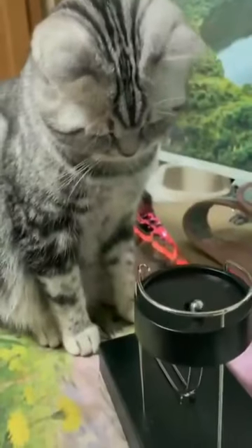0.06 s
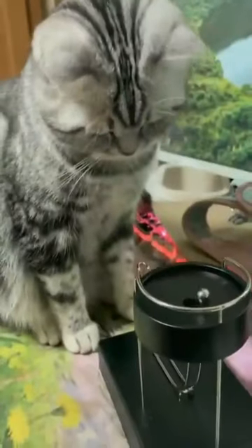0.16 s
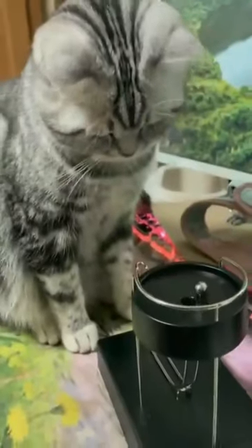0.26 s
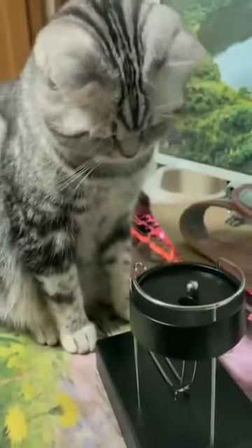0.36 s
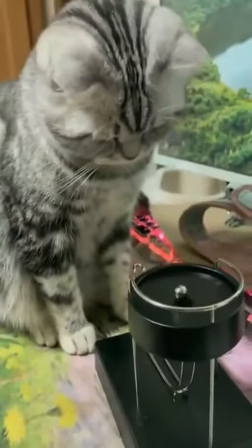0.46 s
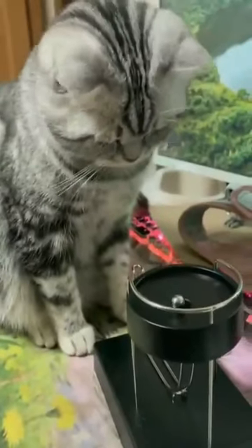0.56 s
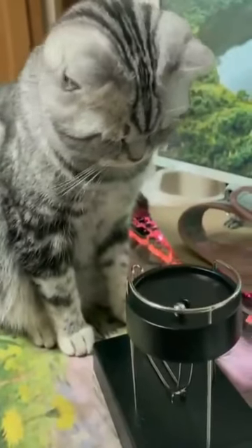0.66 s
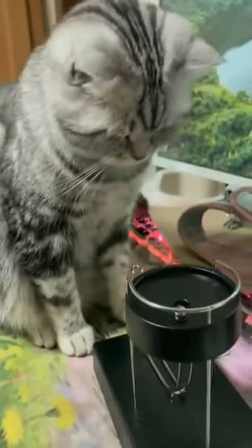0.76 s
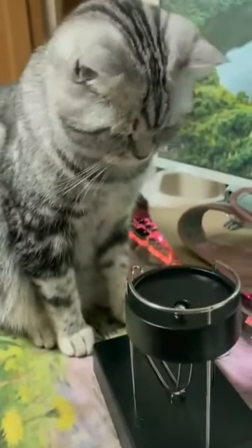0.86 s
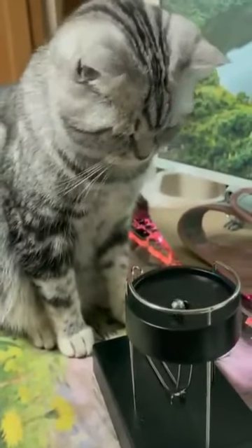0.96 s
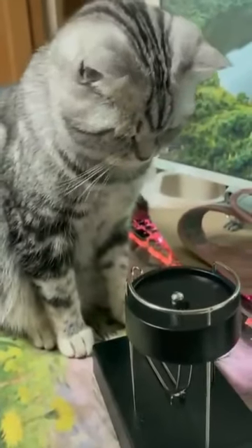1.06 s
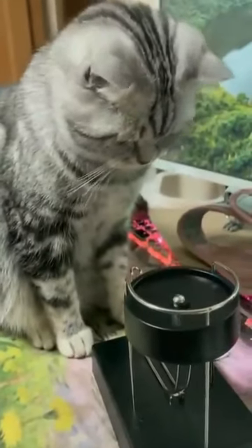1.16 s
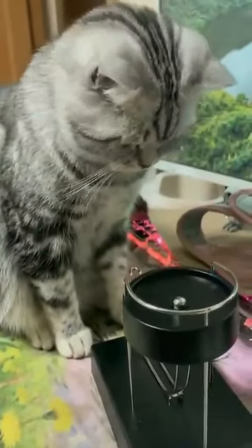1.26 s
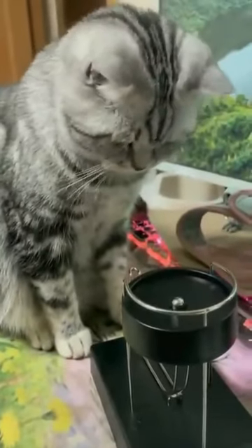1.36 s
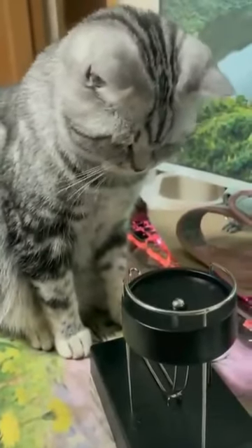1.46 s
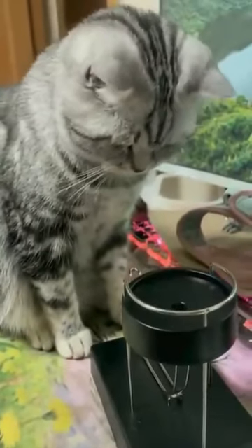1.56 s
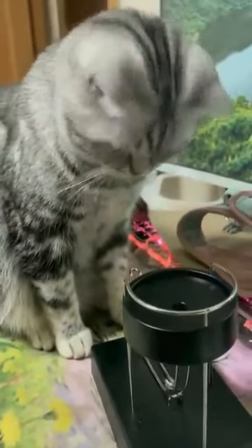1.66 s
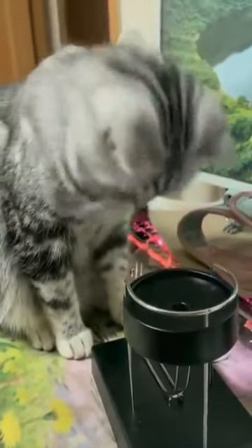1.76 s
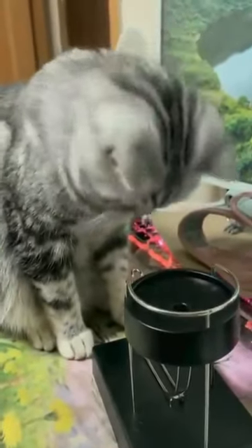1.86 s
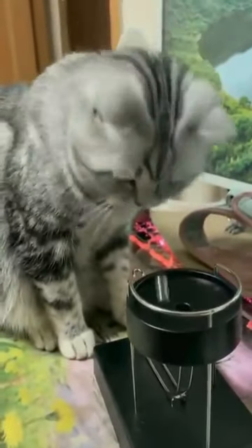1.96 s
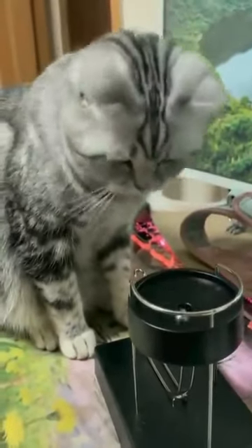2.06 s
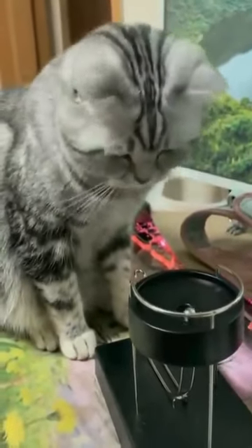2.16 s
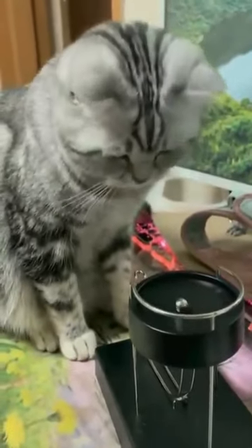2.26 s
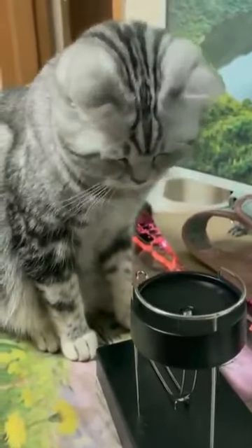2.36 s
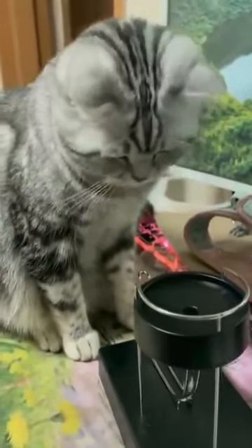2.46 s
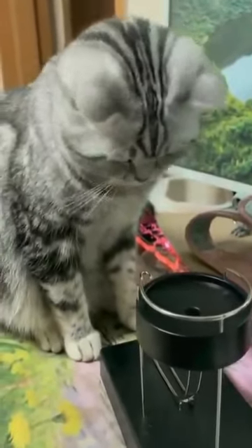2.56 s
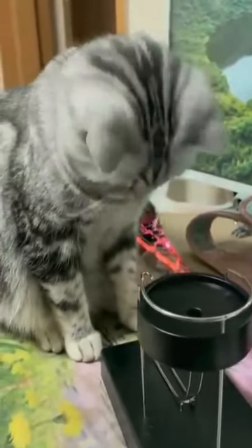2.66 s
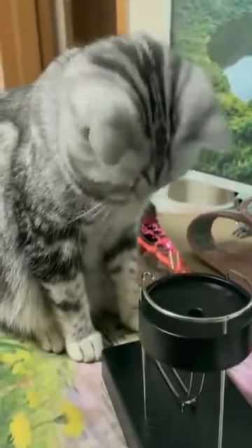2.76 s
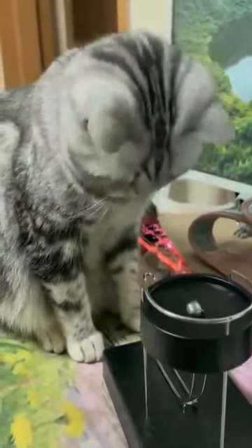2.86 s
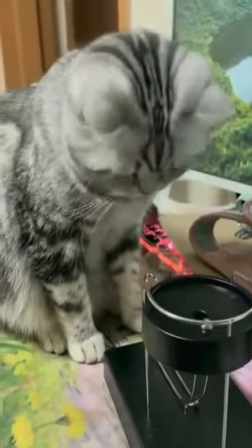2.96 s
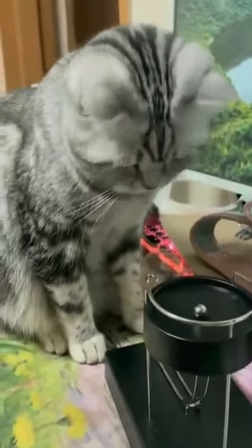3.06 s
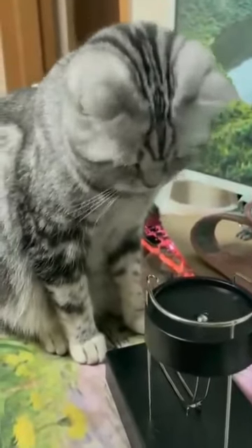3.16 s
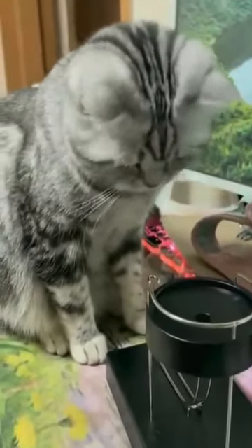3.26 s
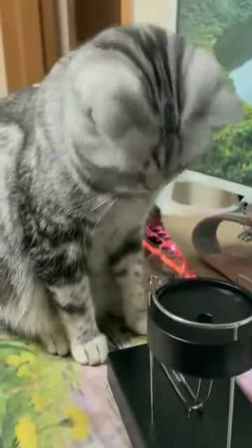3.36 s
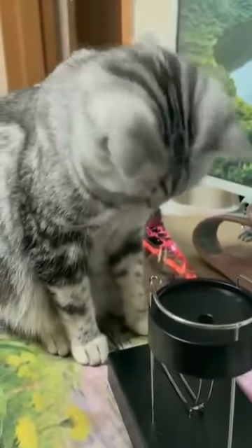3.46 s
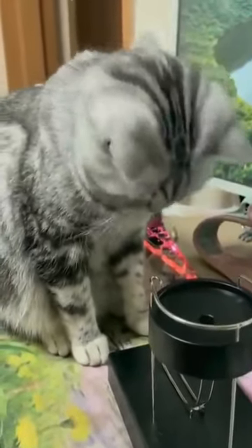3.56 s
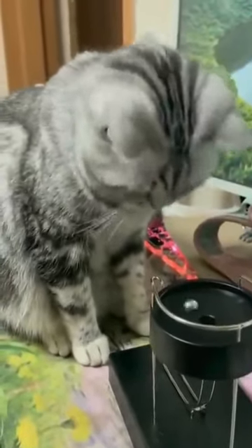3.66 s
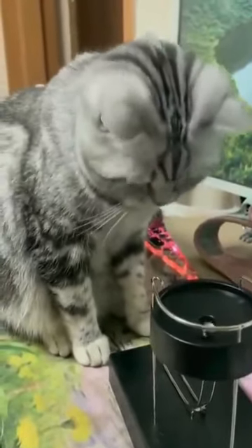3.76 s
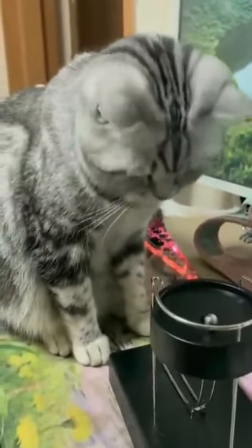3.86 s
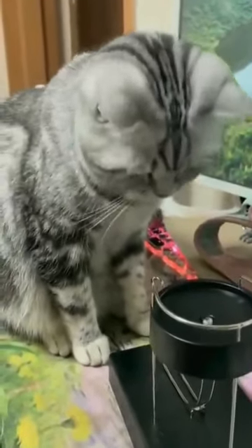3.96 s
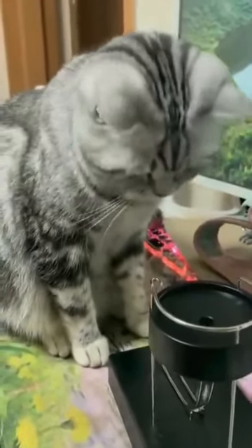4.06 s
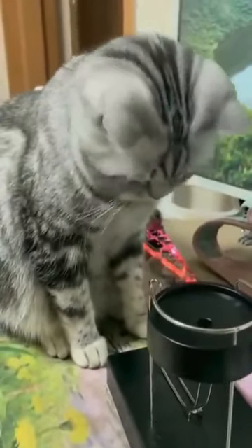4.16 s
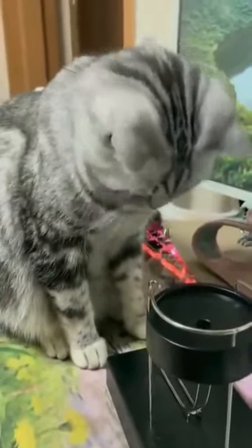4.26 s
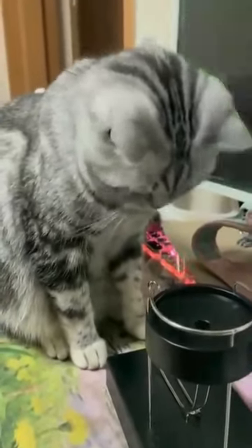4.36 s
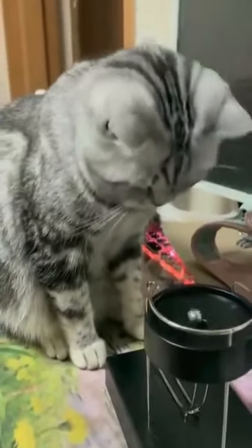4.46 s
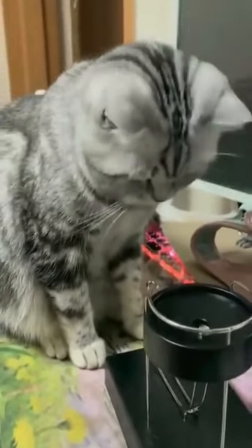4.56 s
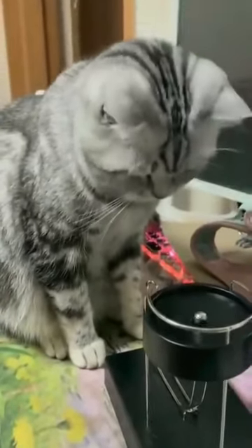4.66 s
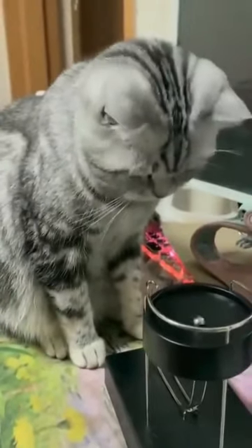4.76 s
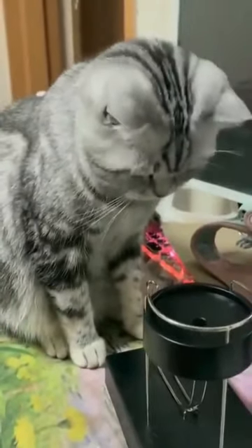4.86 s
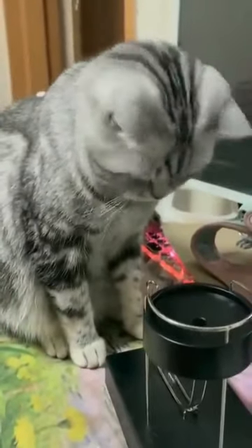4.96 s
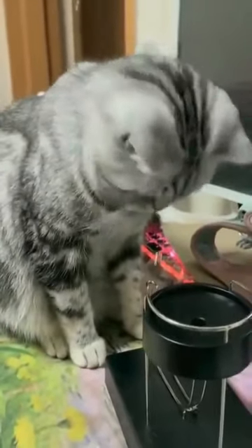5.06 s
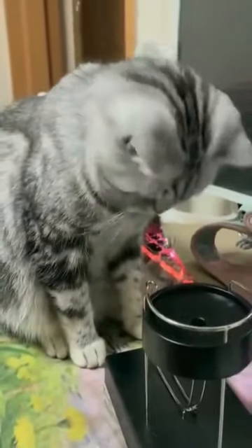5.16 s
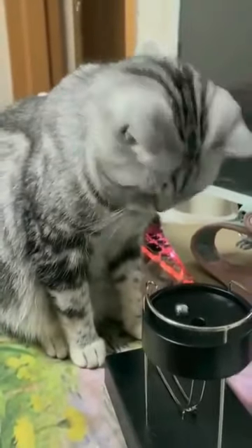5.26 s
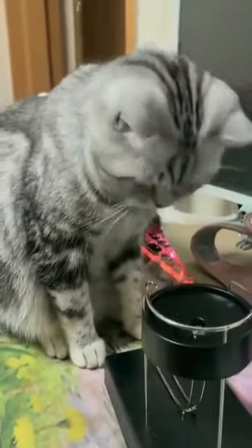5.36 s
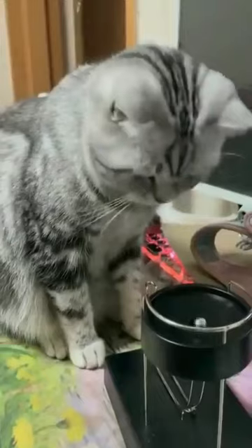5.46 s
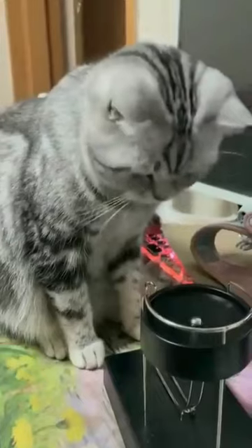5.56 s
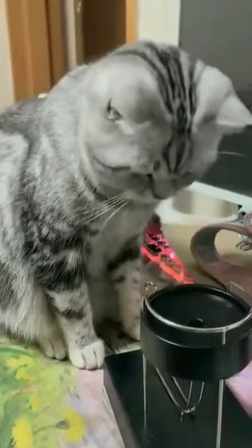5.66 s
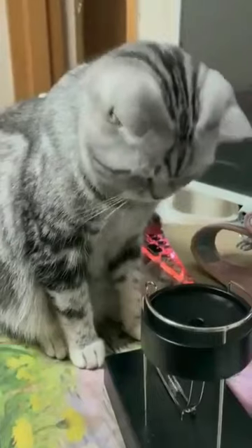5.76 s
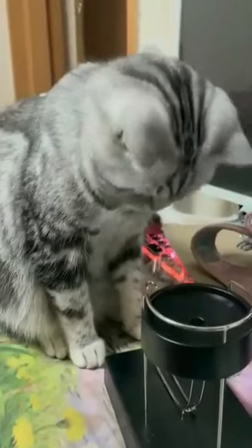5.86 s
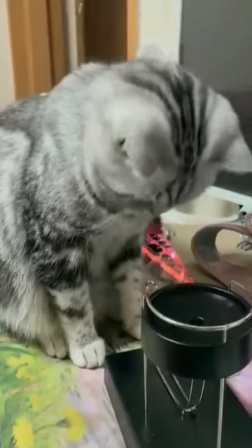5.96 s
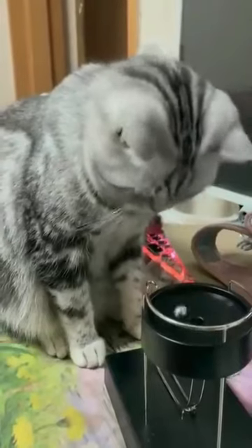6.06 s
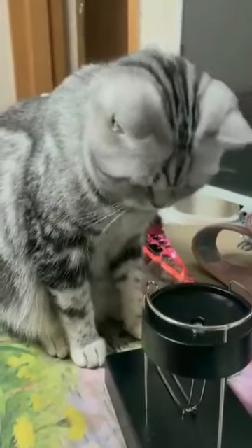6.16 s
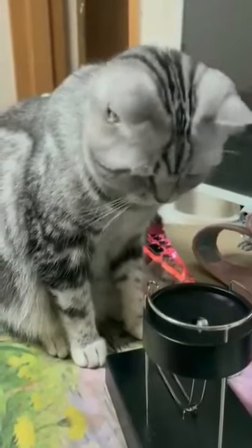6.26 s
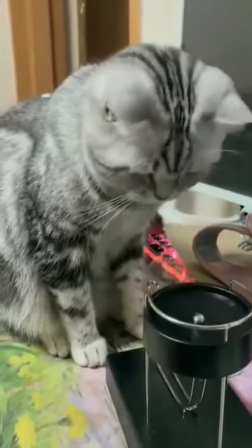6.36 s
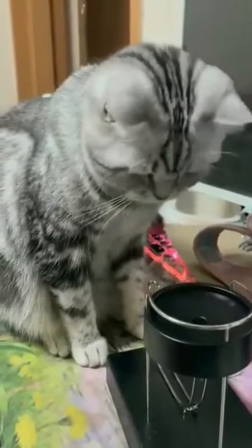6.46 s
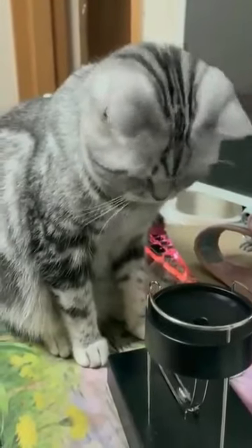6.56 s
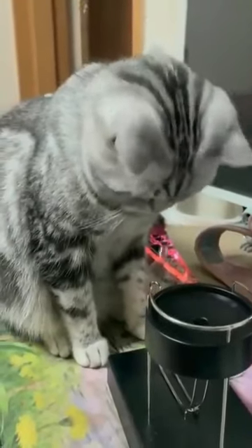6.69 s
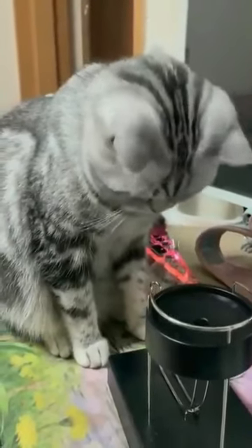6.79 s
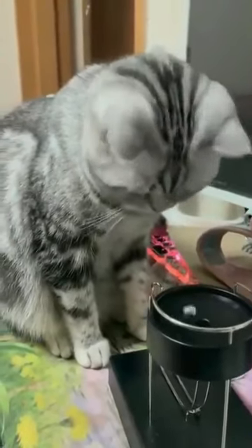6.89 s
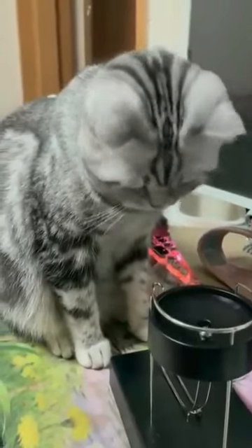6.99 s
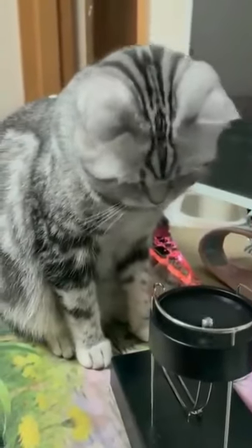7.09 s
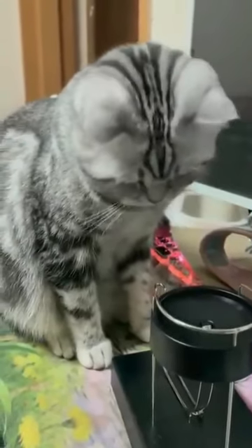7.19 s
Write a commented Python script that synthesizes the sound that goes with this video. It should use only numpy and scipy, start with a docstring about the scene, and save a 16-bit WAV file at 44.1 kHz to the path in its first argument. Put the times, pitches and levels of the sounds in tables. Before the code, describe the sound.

Close by in a quiet room, a metal desk toy sends a steel ball round and round. After some soft circling in the bowl, the ball drops and slides along thin rails with a light, singing hiss. Seven landings follow, a little under a second apart, each a bright crack with quick shrinking bounces, a rim knock and a short roll before the next drop. The base rumbles faintly against the desk.

```python
"""Steel ball looping through a desk toy

A steel ball circles a small bowl, drops through its hole, hisses down wire rails and is flung back up.
On each of seven landings it cracks against the bowl and sets it ringing, hops, knocks the rim and rolls
round to the hole. Rolling bumps make the bowl hum, grit makes the rails sing, and the base thuds on
the desk, all over faint room tone with a short echo."""
import sys
import numpy as np
from scipy import signal
from scipy.fft import rfft, irfft, next_fast_len
from scipy.io import wavfile
from scipy.ndimage import uniform_filter1d

SR = 44100
rng = np.random.default_rng(int(sys.argv[2]) if len(sys.argv) > 2 else 0)


def master_out(mix):
    """Clip the mix to full scale and print it as 16-bit PCM to the path in sys.argv[1]."""
    frames = np.transpose(np.atleast_2d(mix))
    ceiling = np.clip(frames, -1, 1)
    pcm = np.round(ceiling * 32767).astype(np.int16)
    wavfile.write(sys.argv[1], SR, pcm)


N = 318843

# room tone: (frequency [Hz], level [dB])
AIR_SPECTRUM = [(18, -41.5), (30, -1), (64, -11.5), (98, -14), (194, -8.5), (394, -0.5), (937, -7),
                (1010, -12.5), (16000, -38)]
# room echo: (frequency [Hz], t60 [s])
ROOM_DECAY = [(150, 0.51), (500, 0.59), (1500, 0.19), (4000, 0.42), (9000, 0.056), (14000, 0.2)]
# microphone colour: (frequency [Hz], gain [dB])
MIC_EQ = [(25, -2), (70, -4.5), (4500, 1), (4950, -4), (5400, 0.5), (8500, 1), (9000, -5), (9600, 3.5),
          (12000, 10.5), (12500, 6), (14500, 3), (15000, -2.5)]
# base shaking the desk: (frequency [Hz], level [dB])
SHAKE_SPECTRUM = [(30, -27), (60, -15), (85, -6), (145, -8.5), (200, -13), (280, -13.5), (360, -24.5),
                  (500, -70.5)]
# steel on wire: (frequency [Hz], level [dB])
HISS_SPECTRUM = [(240, -47), (400, -24), (581, -1.5), (723, -25.5), (1290, 2), (1480, -4.5), (1650, -9),
                 (2250, -3), (3320, -3.5), (4260, -7), (7010, -1), (8720, -8.5), (11000, -9.5),
                 (15700, -38.5), (16500, -41.5)]
# chatter of a knock: (frequency [Hz], level [dB])
SCUFF_SPECTRUM = [(180, -49), (300, -11), (617, -27), (1000, -5.5), (2400, -8.5), (2790, -3.5),
                  (4690, -10.5), (5020, -11.5), (5930, -5.5), (9020, -13), (11000, -17.5), (15400, -35.5),
                  (16500, -49)]
# first contact of a bounce: (frequency [Hz], level [dB])
CRACK_SPECTRUM = [(290, -55), (500, -6.5), (1310, -9.5), (3210, -6.5), (3770, -12.5), (4420, -12),
                  (4970, -12.5), (6190, -10), (9190, -25.5), (11300, -29.5), (16500, -57)]
# wire rails: (frequency [Hz], level [dB], t60 [s])
RAIL_MODES = [(265, -4, .4), (807, -7, .7), (980, 2, .12), (1809, -13, .5), (3596, -9, .9), (6440, -9, .2),
              (6760, -9, .2), (9819, -7, .1)]
# bowl and base: (frequency [Hz], struck [dB], rolled [dB], t60 [s], off-centre share, base share)
BOWL_MODES = [(80, -23, -59.5, 0.21, 0.1, 0.58), (136.2, -26.5, -45.5, 0.17, 0.081, 0.81),
              (301.5, 0, -5, .035, 0.14, 0.94), (337, -12, -24.5, 0.021, 0.037, 0.43),
              (591, -17, -14.5, 0.05, 0, 0.5), (831, -11.5, -11.5, 0.085, 0, 0),
              (998, -3.5, -6, 0.055, 0.022, 0.092), (1154, -22, -11, 0.063, 0.66, 1),
              (1232.4, 3.5, 1, 0.057, 0.038, 0.03), (1276.6, 3.5, 0, 0.033, 0.091, 0.19),
              (1376, -14, -17, .045, 1, 0.38), (1643, -4.5, 1.5, 0.033, 1, 0.65),
              (1692, -0.5, -1.5, 0.022, 0.97, 0.41), (1885, 0, -4, 0.022, 0.46, 0.022),
              (2167, 3.5, -3, 0.018, 0.47, 0.1), (2467, 0.5, -2, 0.019, 0.53, 0.015),
              (2700, -17.5, -13.5, 0.039, 1, 0.0095), (3159, -9, -11.5, 0.02, 1, 1),
              (3850, -38.5, -26, .015, 0.19, 0), (4250, -27.5, -21, 0.022, .3, 0.083),
              (6200, -31.5, -14.5, 0.0088, .6, 0.02), (6900, -39, -29, .01, .6, 0.13)]

# Cues. Brightness, ring and travel levels are relative: each voice adds its own trim.
# laps of the bowl: (landing [s], peak [dB], base ring [dB], first hop [s], second hop [s],
# small touches [dB], settling roll [dB], rim hit [s], rim peak [dB], rim off-centre ring [dB],
# rim roll [dB], rim scrape [dB])
BOWL_LAPS = [(2.028, -5, -14, .091, .054, -18, -26.5, 2.298, -9.5, -2, -60, -71),
             (2.862, -3, -16.5, 0.096, .046, -18.5, -31, 3.12, -6, -4.5, -36.5, -58.5),
             (3.701, -4.5, -10.5, .078, .042, -21.5, -31.5, 3.97, -8, -1.5, -39.5, -50),
             (4.466, -5.5, -13.5, .097, .049, -18.5, -29, 4.718, -9, -5.5, -37, -64),
             (5.302, -3.5, -15, .077, .039, -27, -31, 5.574, -8, -1.5, -39, -54.5),
             (6.114, -5.5, -13, .085, .045, -21.5, -32, 6.378, -6, -4.5, -33.5, -53.5),
             (6.926, -6.5, -13.5, 0.082, .044, -19.5, -31.5, 7.195, -7, -4.5, -35.5, -54)]
# touches ending hops one and two: (peak [dB], brightness [dB], off-centre ring [dB], base ring [dB])
FIRST_TOUCHES = [(-7.5, -24, -23, -20), (-13, -29, -35, -21.5)]
# the last two: (peak over the lap's small touches [dB], brightness [dB], off-centre [dB], base [dB])
LAST_TOUCHES = [(0, -32, -40.5, -18.5), (-7.5, -36, -39, -19)]
# small rebounds off the rim: (time [s], peak [dB], brightness [dB])
RIM_REBOUNDS = [(2.405, -19, -17), (3.141, -21, -31), (3.998, -17, -13.5), (5.6, -19.5, -26),
                (6.398, -23, -28.5), (6.422, -19.5, -24)]
# dull scuffs at the lip of the hole: (time [s], peak [dB], length [s])
HOLE_SCUFFS = [(1.59, -15.5, 0.014), (2.427, -14, 0.012), (3.176, -23.5, 0.056), (3.246, -19, 0.013),
               (4.026, -17.5, 0.025), (4.853, -19, 0.018), (5.661, -16, 0.022), (6.467, -16.5, 0.017)]
# runs down the rails: (drop [s], knock peak [dB], knock length [s], bend [s], push [dB],
# take-off [s], bowl hum at take-off [dB], hiss [dB])
RAIL_RUNS = [(1.627, -10, 0.0089, 1.724, -34.5, 1.795, -34, -29.5),
             (2.467, -11.5, 0.015, 2.564, -32.5, 2.632, -35.5, -30),
             (3.29, -14, 0.019, 3.494, -39, 3.48, -38.5, -27),
             (4.072, -10, .011, 4.185, -32.5, 4.232, -38, -29),
             (4.899, -12.5, .014, 5.035, -37, 5.079, -34.5, -30),
             (5.706, -13, 0.017, 5.846, -37, 5.893, -36.5, -30.5),
             (6.515, -12, 0.014, 6.59, -37.5, 6.697, -40, -30.5)]
# jolts on the rails in mid run: (time [s], peak [dB], brightness [dB], length [s])
RAIL_JOLTS = [(4.967, -16.5, -21.5, 0.013), (5.751, -26, -24.5, .006), (5.85, -19.5, 4, 0.038)]

# Travel keyframes end in four faders: (roll [dB], off-centre ring [dB], scrape [dB], shake [dB]).
# faint rolling, a brief soft rail hiss, then louder circling toward the hole:
# (time [s], four faders [dB])
OPENING_KEYS = [(0.0, -60.5, -16, -104, -68), (0.052, -50, -19.5, -90, -64), (0.118, -47, -11, -100, -64),
                (0.25, -61.5, -10, -80, -60.5), (0.316, -87, -2, -91, -72), (0.47, -77.5, -1, -94, -74),
                (0.528, -45.5, -5.5, -83, -68), (0.61, -45.5, -10, -83, -69), (0.66, -54.5, -13, -53, -67),
                (0.726, -67.5, -10.5, -52.5, -67), (0.888, -82, -6, -91, -82), (1.068, -50, -12, -89, -73),
                (1.134, -38.5, -0.5, -82, -78), (1.25, -39.5, 0.5, -75, -78), (1.314, -34, 0.5, -66, -77.5),
                (1.43, -38, 0, -67, -82), (1.54, -40, 3, -68, -84), (1.58, -43.5, -2.5, -69, -50.5)]
# hops dying out: (time after the third hop [s], four faders [dB]); roll adds to the lap's settling roll
SETTLING_KEYS = [(.02, 0, -13.5, -60.5, -47.5), (.055, -11.5, -11.5, -76, -56.5)]
# nearing the rim: (time from the rim hit [s], four faders [dB])
NEAR_RIM_KEYS = [(-.022, -43, -8, -73, -57.5), (-.008, -57, 2.5, -74.5, -60.5)]
# round the rim: (time from the rim hit [s], four faders [dB]); roll and scrape add to the lap's
ROUND_RIM_KEYS = [(0.039, 0.5, 1.5, 0, -47), (.07, -1, 2.2, -1, -53.5)]
# down the rails: (share of the way to the bend, four faders [dB]); scrape adds to the run's hiss
DOWNHILL_KEYS = [(.24, -39, -15, -15, -49.5), (.52, -31.5, -17.5, -5, -60), (.8, -39.5, -4.5, -6, -58),
                 (1.03, -43, -5.5, -2, -41)]
# leaving the rails: (time after take-off [s], four faders [dB]); scrape adds to the run's hiss
FLYING_KEYS = [(0.034, -62, -3, -22, -54), (.17, -84.5, -2, -41.5, -70)]
IN_FLIGHT = (-76.5, 4, -67.5, -64.5)  # just before a landing: (four faders [dB])
AT_HOLE = (-.05, -4, 0.5, -5, -50.5)  # (time from the drop [s], four faders [dB]), added as on the rim

HOP_RATIO = .57  # each hop after the second lasts this share of the one before
CLACK_DB, CLACK_S = 5.5, 0.0022  # the bowl flexes hard under the ball, then rings at a lower level
AIR_DB, ECHO_DB, LOWPASS_HZ = -72, -15, 16600


def gain(db):
    """Decibels to an amplitude factor."""
    return 10 ** (np.asarray(db) / 20)


def unit_rms(x):
    """Scales to rms 1."""
    return x / np.sqrt(np.mean(x ** 2) + 1e-20)


def unit_peak(x):
    """Scales to peak 1."""
    return x / np.max(np.abs(x))


def curve_at(points, hz):
    """Reads a curve on a log-frequency axis."""
    f, value = np.transpose(points)
    return np.interp(np.log(hz + 1), np.log(f + 1), value)


def add(mix, s, sound):
    """Mixes a sound in at s seconds."""
    part = mix[round(s * SR):][:len(sound)]
    part += sound[:len(part)]


def coloured(x, spectrum, shelf_db=0):
    """Shapes x with a spectrum and a treble shelf at 3.5 kHz, at rms 1."""
    size = next_fast_len(len(x))
    hz = np.fft.rfftfreq(size, 1 / SR)
    shelf = shelf_db / (1 + (3500 / (hz + 1)) ** 4)
    return unit_rms(irfft(rfft(x, size) * gain(curve_at(spectrum, hz) + shelf), size)[:len(x)])


def ring(hz, db, t60, phase=0, seconds=.25):
    """Ringing modes: a sum of dying sines."""
    t = np.arange(round(seconds * SR))[:, None] / SR
    return (gain(db - 60 * t / t60) * np.sin(2 * np.pi * hz * t + phase)).sum(axis=1)


def grit(per_s, spread_db):
    """A stream of tiny, uneven contact clicks."""
    size = gain(spread_db * np.minimum(rng.exponential(1, N), 5))
    return rng.standard_normal(N) * size * (rng.random(N) < per_s / SR)


def room_tone():
    """A faint, steady bed of air."""
    return gain(AIR_DB) * coloured(rng.standard_normal(N), AIR_SPECTRUM)


def room_echo(x):
    """Sparse reflections of random sign, each band dying at its own speed."""
    taps = np.zeros(SR)
    at = np.arange(300, SR - 20, 20)
    taps[at + rng.integers(0, 20, len(at))] = rng.choice([-1., 1.], len(at))
    hz, t, bands = signal.stft(taps, SR, nperseg=256)
    decay = gain(-60 * t / curve_at(ROOM_DECAY, hz)[:, None])
    tail = signal.istft(bands * decay, SR, nperseg=256)[1]
    return signal.fftconvolve(x, tail / np.linalg.norm(tail))[:N]


def desk_shake(level):
    """Low rumble of the base shaking the desk."""
    return coloured(rng.standard_normal(N), SHAKE_SPECTRUM) * level


def rail_ring(level):
    """Rubbing feeds the wires' long modes, which sing on after the ball has gone."""
    modes = ring(*np.transpose(RAIL_MODES), seconds=0.78)
    return signal.fftconvolve(rng.standard_normal(N) * level, modes / np.linalg.norm(modes))[:N]


def steel_scrape(level):
    """Grit on rim or rails sounds many short, high modes; the set changes as the ball moves along."""
    t = np.arange(N) / SR
    rub = grit(per_s=12000, spread_db=2.4)
    sizzle = np.zeros(N)
    for k in range(3):
        hz = rng.uniform(700, 15000, 110)
        db = curve_at(HISS_SPECTRUM, hz) + 3.5 * rng.standard_normal(len(hz))
        modes = ring(hz, db, t60=.05, phase=rng.uniform(0, 2 * np.pi, len(hz)), seconds=0.12)
        crossfade = np.cos(np.pi * (6 * t + k / 3)) ** 2
        sizzle += signal.oaconvolve(rub * crossfade * level, modes)[:N]
    hiss = coloured(rub, HISS_SPECTRUM) * level
    return sizzle * np.std(hiss) / np.std(sizzle) + gain(-1) * hiss


def bowl_hum(level, off_centre_db):
    """Blunt bumps under the rolling ball build each mode softly; wide circles wake off-centre ones."""
    hz, _, db, t60, off_centre, _ = np.transpose(BOWL_MODES)
    bumps = grit(per_s=2500, spread_db=4.34) * level
    hum = np.zeros(N)
    for share in np.unique(off_centre):
        group = off_centre == share
        modes = ring(hz[group], db[group], t60[group], seconds=.15)
        modes *= (1 - np.exp(-np.arange(len(modes)) / SR / 0.0013)) ** 2
        drive = gain(share * (np.minimum(off_centre_db, 3) + 6))
        hum += signal.oaconvolve(bumps * drive, modes)[:N]
    return hum * np.std(level) / np.std(hum)


def travel_keyframes():
    """Lays the fader moves along every lap and run, in time order."""
    keys = list(OPENING_KEYS)
    for land, _, _, first, second, _, settle_db, rim, _, _, roll_db, scrape_db in BOWL_LAPS:
        settled = land + first + second * (1 + HOP_RATIO)
        keys.append((land - .018, *IN_FLIGHT))
        keys += [(settled + s, settle_db + roll, *rest) for s, roll, *rest in SETTLING_KEYS]
        keys += [(rim + s, *rest) for s, *rest in NEAR_RIM_KEYS]
        for s, roll, off_centre, scrape, shake in ROUND_RIM_KEYS:
            keys.append((rim + s, roll_db + roll, off_centre, scrape_db + scrape, shake))
    s, roll, off_centre, scrape, shake = AT_HOLE
    for (*_, roll_db, scrape_db), (drop, *_) in zip(BOWL_LAPS, RAIL_RUNS[1:]):
        keys.append((drop + s, roll_db + roll, off_centre, scrape_db + scrape, shake))
    for drop, _, _, bend, _, take_off, hum_db, hiss_db in RAIL_RUNS:
        for way, roll, off_centre, scrape, shake in DOWNHILL_KEYS:
            keys.append((drop + (bend - drop) * way, roll, off_centre, hiss_db + scrape, shake))
        keys.append((take_off, hum_db, -11, hiss_db, -43.5))
        for s, roll, off_centre, scrape, shake in FLYING_KEYS:
            keys.append((take_off + s, roll, off_centre, hiss_db + scrape, shake))
    return np.array(sorted(keys))


def travel():
    """The moving ball's bed: rail ring, desk shake, bowl hum and scrape ride the four faders."""
    times, *faders = travel_keyframes().T
    t = np.arange(N) / SR
    roll_db, off_centre_db, scrape_db, shake_db = (np.interp(t, times, fader) for fader in faders)
    wires = gain(-21.5) * rail_ring(gain(scrape_db))
    desk = gain(2) * desk_shake(gain(shake_db))
    hum = gain(2.5) * bowl_hum(gain(roll_db), off_centre_db)
    scrape = gain(-5) * steel_scrape(gain(scrape_db))
    return wires + desk + hum + scrape


def bend_swoop(level_db):
    """A low push that slides upward as the ball whips through the bend."""
    t = np.arange(5000) / SR
    hz = 130 + 145 / (1 + np.exp(-(t - .03) / 0.0037))
    wobble = 1 + 0.35 * unit_rms(uniform_filter1d(rng.standard_normal(len(t)), 300))
    envelope = (1 - np.exp(-t / 0.013)) / (1 + (t / 0.065) ** 16)
    return gain(level_db) * envelope * wobble * np.sin(2 * np.pi * (np.cumsum(hz) / SR + rng.random()))


def knock(peak_db, bright_db, length_s, attack_s=.00027):
    """A quick chatter of contacts that shakes the bowl a little and sets the rails ringing."""
    hz, db, _, t60, _, _ = np.transpose(BOWL_MODES)
    t = np.arange(9000) / SR
    envelope = (1 - np.exp(-t / attack_s)) / (1 + (t / length_s) ** 6.8)
    chatter = coloured(rng.standard_normal(len(t)), SCUFF_SPECTRUM, bright_db + 21) * envelope
    bowl = signal.fftconvolve(chatter, ring(hz, db, t60))[:len(t)]
    wires = signal.fftconvolve(chatter, ring(*np.transpose(RAIL_MODES)))[:len(t)]
    mix = unit_peak(chatter) + gain(-10.5) * unit_peak(bowl) + gain(-19) * unit_peak(wires)
    fade_out = signal.windows.tukey(2 * len(t), .3)[len(t):]
    return gain(peak_db) * unit_peak(mix) * fade_out


def bounce(peak_db, bright_db, off_centre_db=-1.5, base_db=-20):
    """A short crack, then the bowl rings; where the ball strikes sets which modes answer."""
    hz, db, _, t60, off_centre, base = np.transpose(BOWL_MODES)
    db = db + off_centre * (off_centre_db + 22.5) + base * (base_db + 34.5)
    db += 2.8 * rng.standard_normal(len(hz))
    t = np.arange(7000)[:, None] / SR
    # the blow passes down the posts, so the heavy base swells in late
    attack = (1 - np.exp(-t / (0.00036 + 0.0067 * base))) ** 2.35
    clack = gain(CLACK_DB * np.exp(-t / CLACK_S) * (1 - base))
    modes = attack * clack * gain(db - 60 * t / t60) * np.sin(2 * np.pi * hz * t)
    body = unit_peak(modes.sum(axis=1))
    t = t[:, 0]
    crack = coloured(rng.standard_normal(len(t)), CRACK_SPECTRUM, bright_db + 20)
    snap_and_tail = gain(-60 * t / 0.021) + gain(-30.5 - 60 * t / 0.45)
    crack *= (1 - np.exp(-t / 0.00041)) ** 3 * snap_and_tail
    return gain(peak_db) * unit_peak(body + gain(-8) * crack)


def bounces():
    """Yields (time [s], sound) for rim rebounds, landings, rim hits and ever shorter hops."""
    for s, peak_db, bright_db in RIM_REBOUNDS:
        yield s, bounce(peak_db, bright_db)
    for land, land_db, base_db, first, second, small_db, _, rim, rim_db, ring_db, *_ in BOWL_LAPS:
        yield land, bounce(land_db, bright_db=-21, off_centre_db=-18, base_db=base_db)
        yield rim, bounce(rim_db, bright_db=-23, off_centre_db=ring_db)
        times = land + np.cumsum([first, second, second * HOP_RATIO, second * HOP_RATIO ** 2])
        touches = FIRST_TOUCHES + [(small_db + db, *tone) for db, *tone in LAST_TOUCHES]
        for s, touch in zip(times, touches):
            yield s, bounce(*touch)


def scene():
    """Hits and swoops over the rolling bed, set in a quiet room; mono."""
    toy = travel()
    for s, hit in bounces():
        add(toy, s + .0014, hit)
    for s, db, length_s in HOLE_SCUFFS:
        add(toy, s, knock(db, bright_db=-42.5, length_s=length_s, attack_s=.004))
    for drop, db, length_s, bend, push_db, *_ in RAIL_RUNS:
        add(toy, drop, knock(db, bright_db=-26, length_s=length_s))
        add(toy, bend, bend_swoop(push_db))
    for s, *jolt in RAIL_JOLTS:
        add(toy, s, knock(*jolt))
    return (room_tone() + toy + gain(ECHO_DB) * room_echo(toy))[None]


def record(dry):
    """The microphone's colour, then a steep low-pass."""
    size = next_fast_len(N)
    eq = gain(curve_at(MIC_EQ, np.fft.rfftfreq(size, 1 / SR)))
    heard = irfft(rfft(dry, size) * eq, size)[:, :N]
    lowpass = signal.firwin(511, LOWPASS_HZ, window=("kaiser", 9), fs=SR)
    return signal.oaconvolve(heard, lowpass[None], "same")


dry = scene()
out = record(dry)
master_out(out)
```